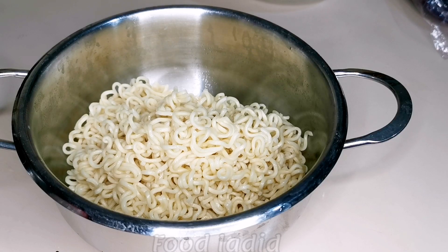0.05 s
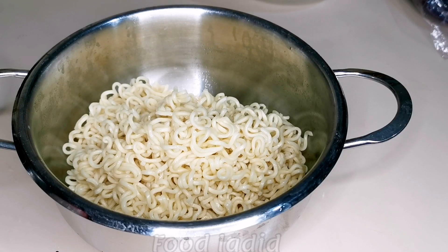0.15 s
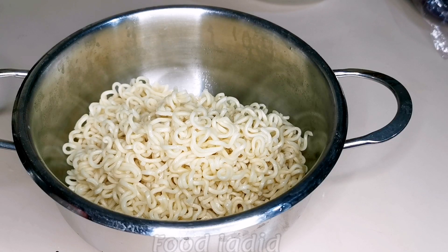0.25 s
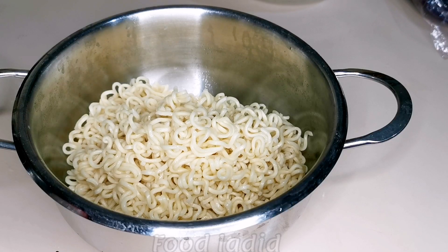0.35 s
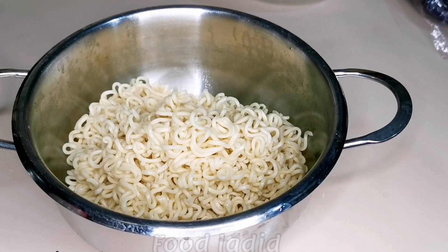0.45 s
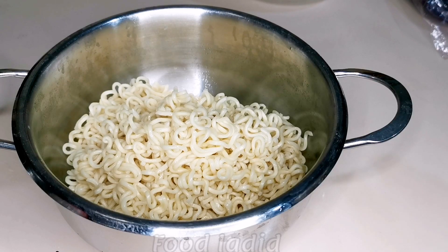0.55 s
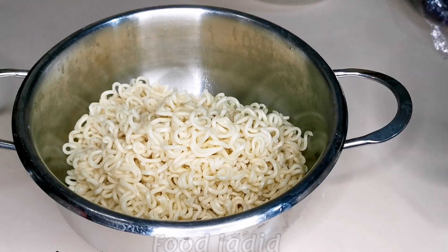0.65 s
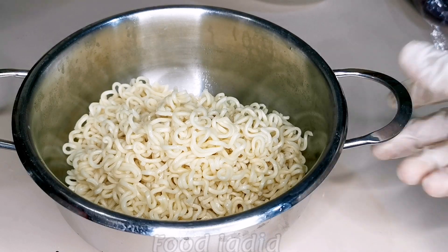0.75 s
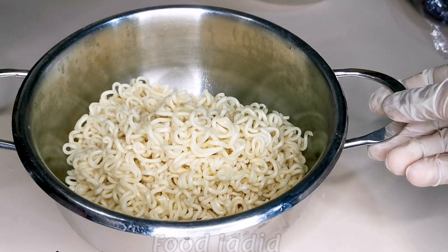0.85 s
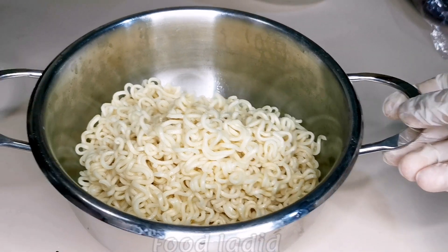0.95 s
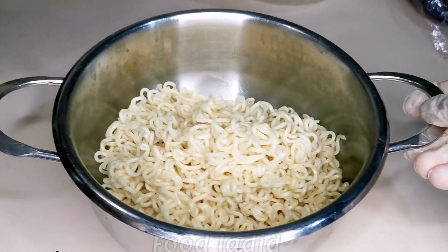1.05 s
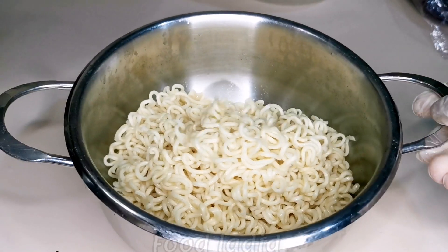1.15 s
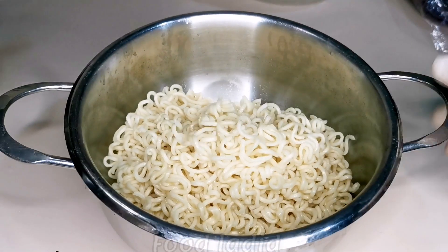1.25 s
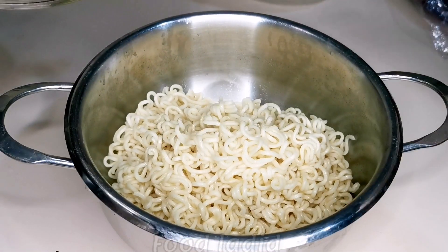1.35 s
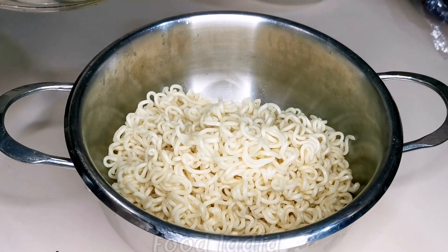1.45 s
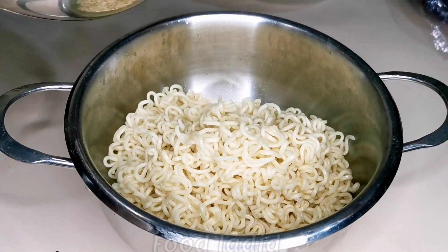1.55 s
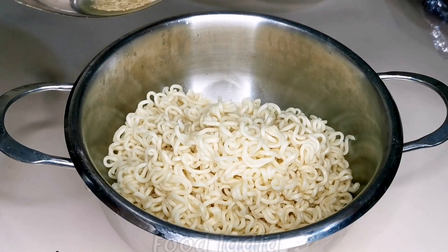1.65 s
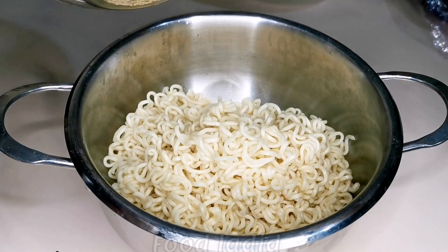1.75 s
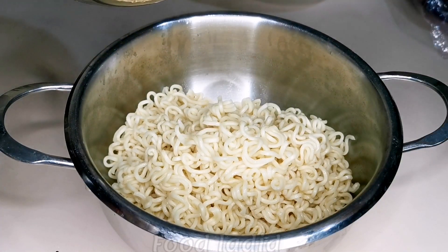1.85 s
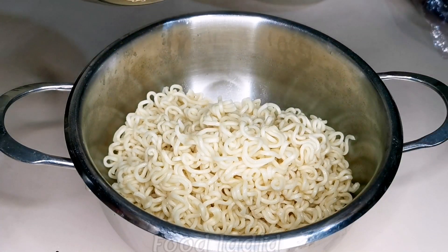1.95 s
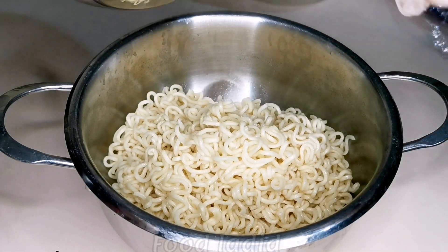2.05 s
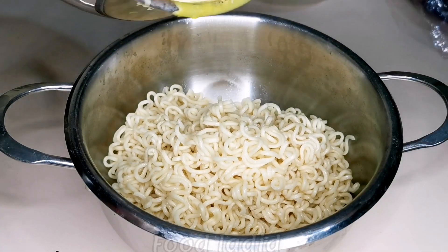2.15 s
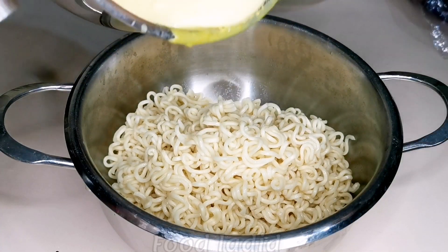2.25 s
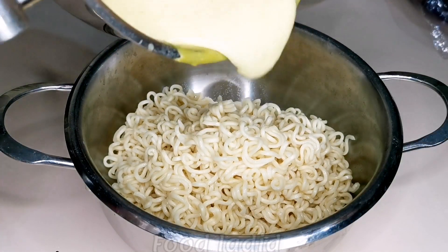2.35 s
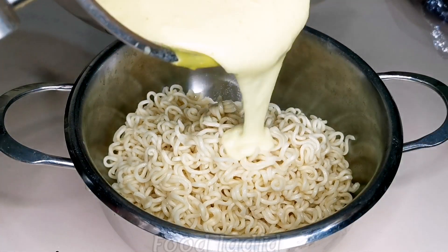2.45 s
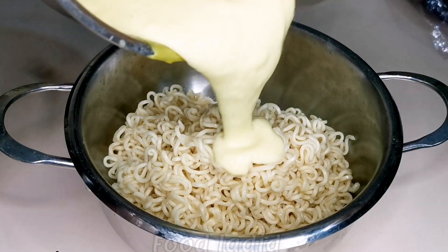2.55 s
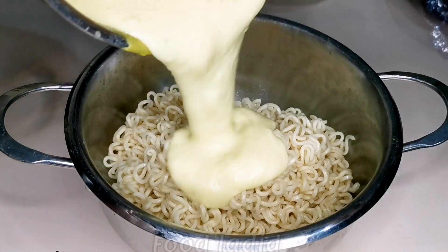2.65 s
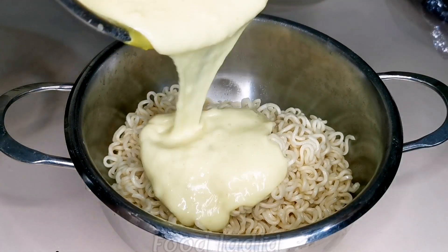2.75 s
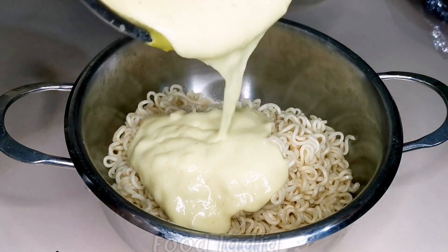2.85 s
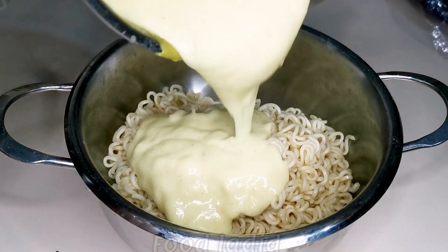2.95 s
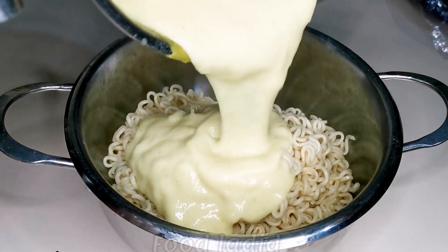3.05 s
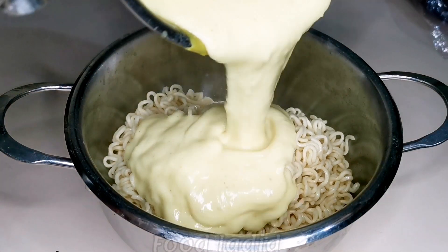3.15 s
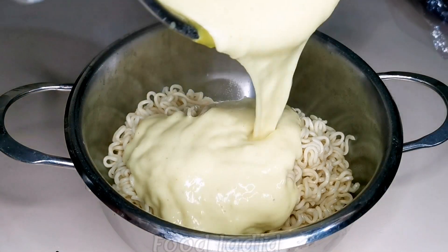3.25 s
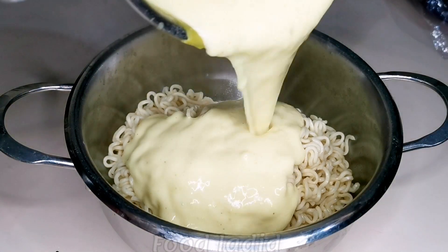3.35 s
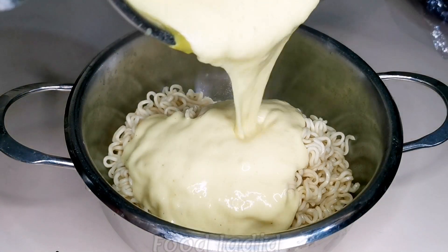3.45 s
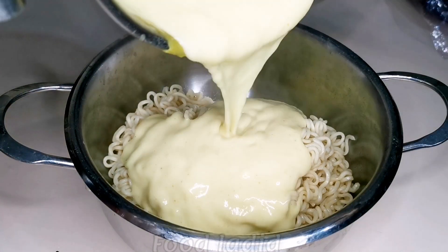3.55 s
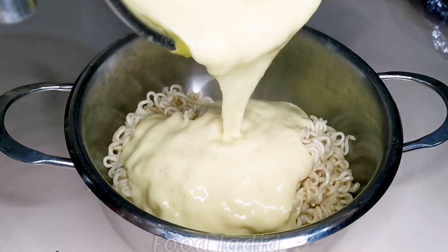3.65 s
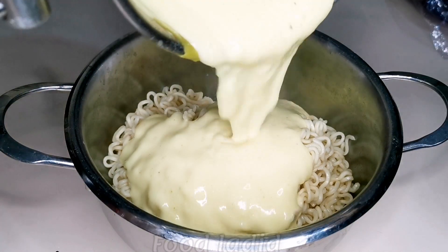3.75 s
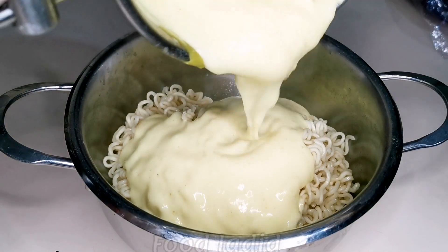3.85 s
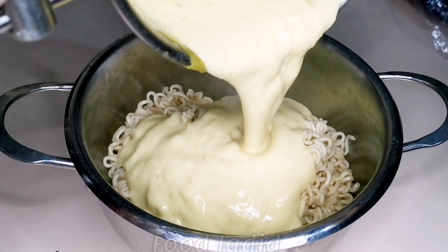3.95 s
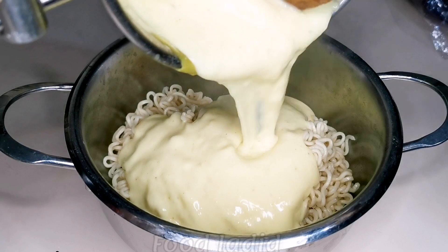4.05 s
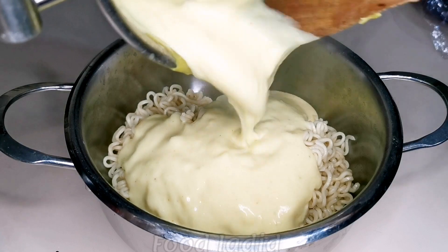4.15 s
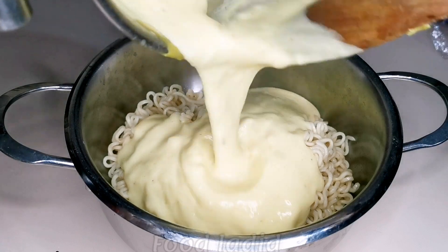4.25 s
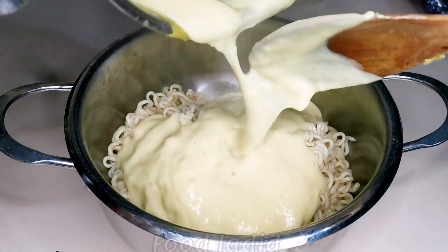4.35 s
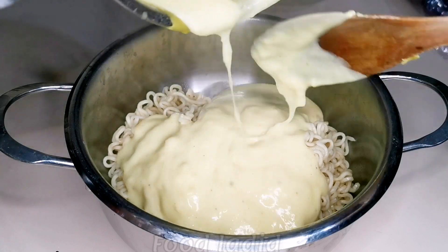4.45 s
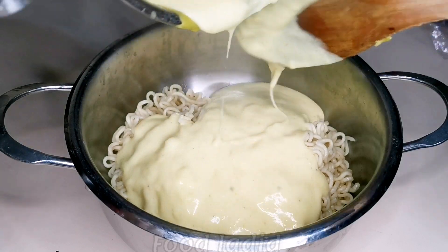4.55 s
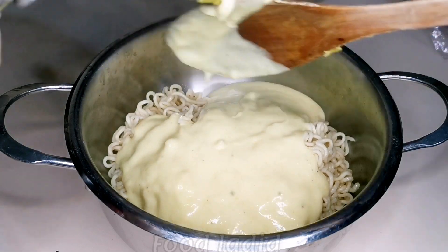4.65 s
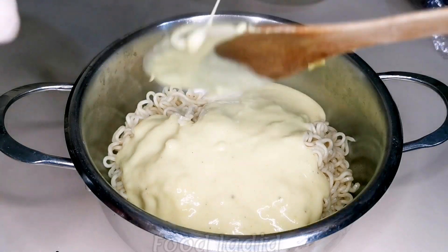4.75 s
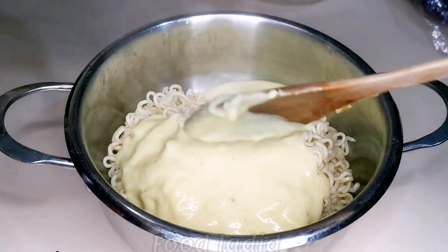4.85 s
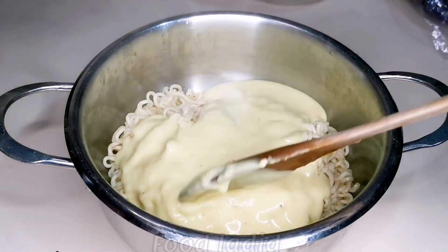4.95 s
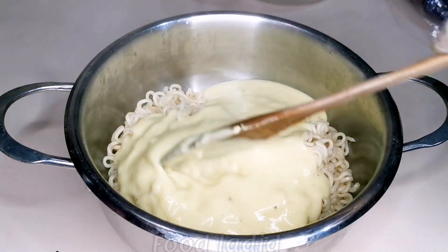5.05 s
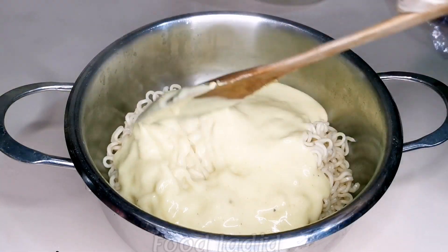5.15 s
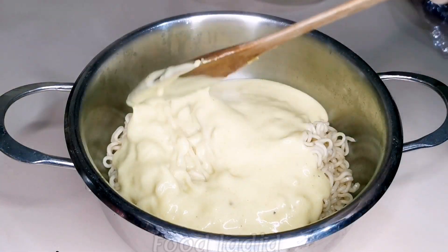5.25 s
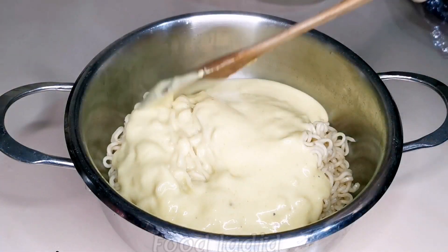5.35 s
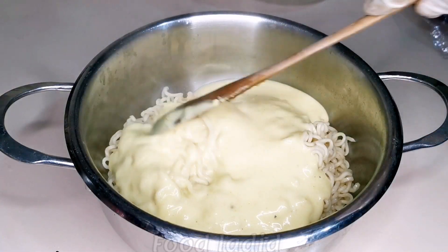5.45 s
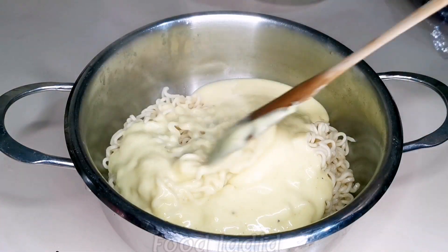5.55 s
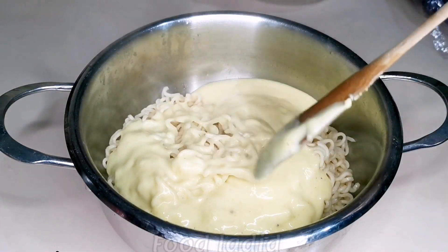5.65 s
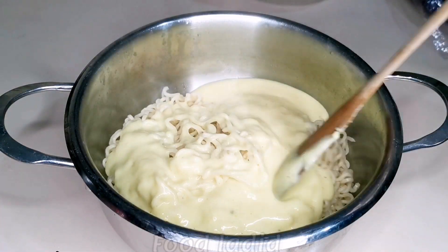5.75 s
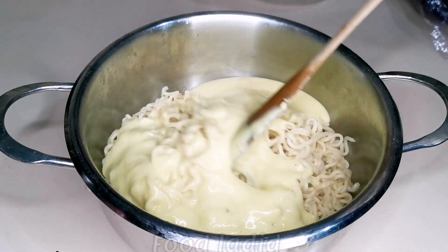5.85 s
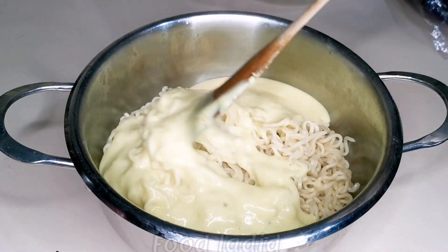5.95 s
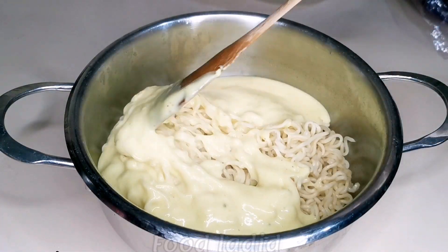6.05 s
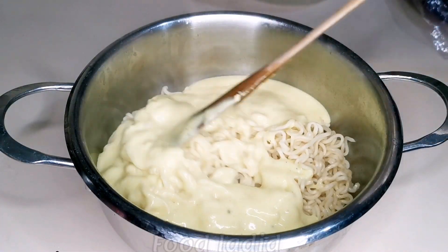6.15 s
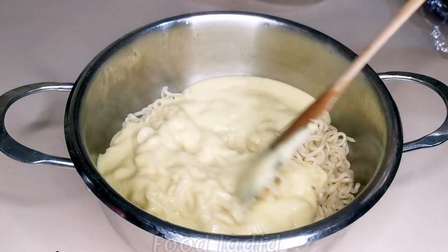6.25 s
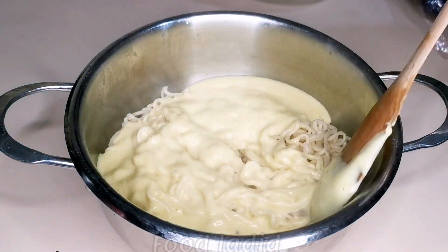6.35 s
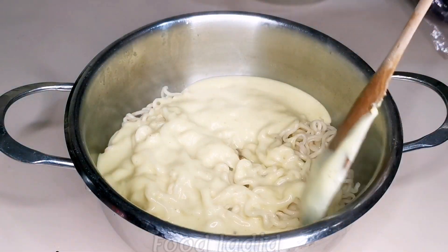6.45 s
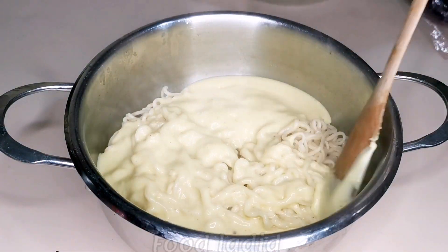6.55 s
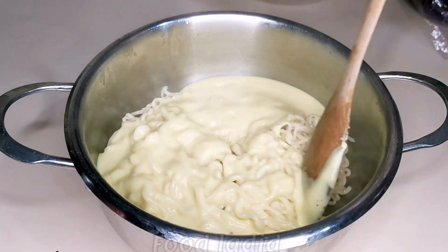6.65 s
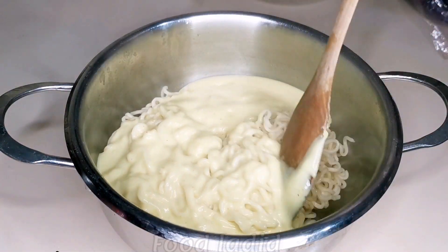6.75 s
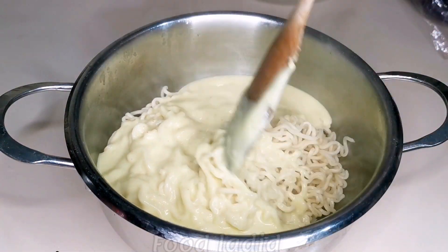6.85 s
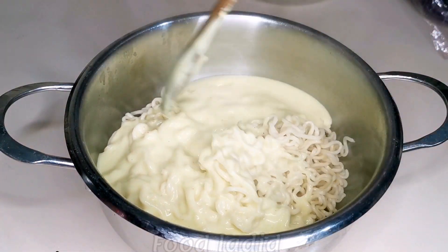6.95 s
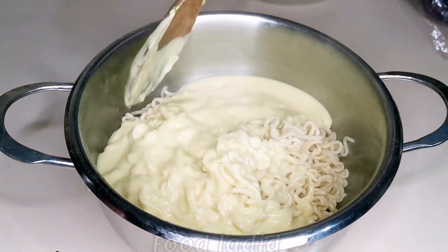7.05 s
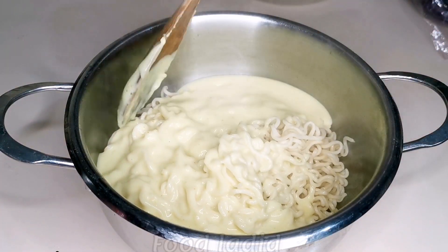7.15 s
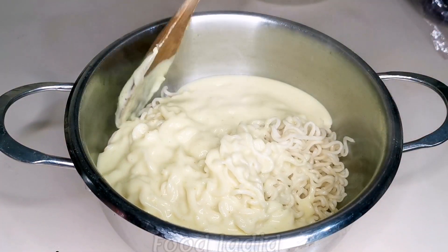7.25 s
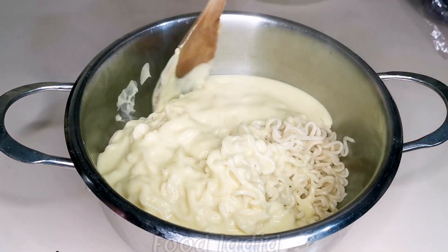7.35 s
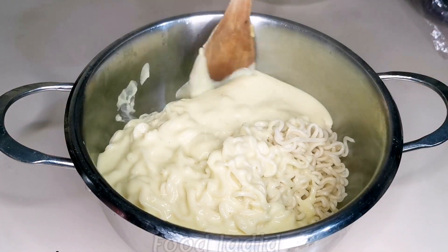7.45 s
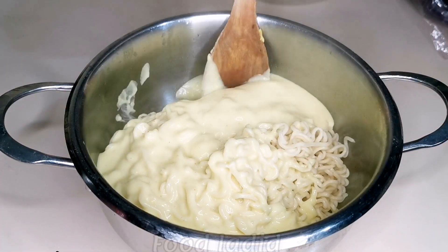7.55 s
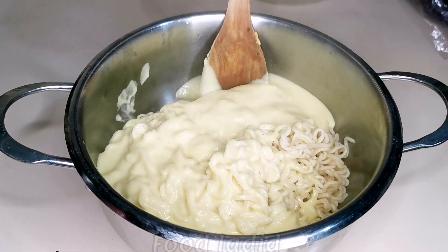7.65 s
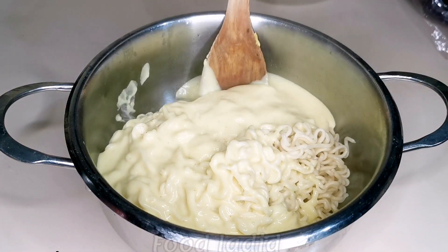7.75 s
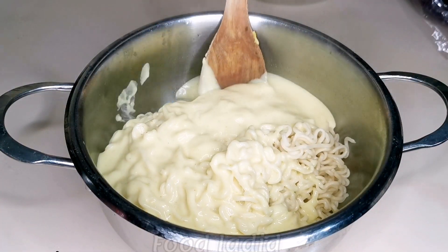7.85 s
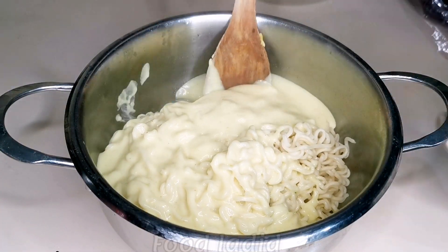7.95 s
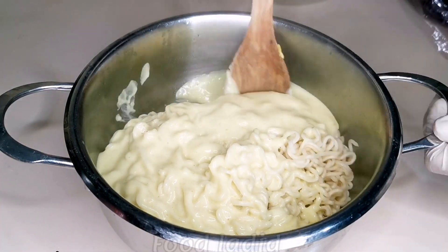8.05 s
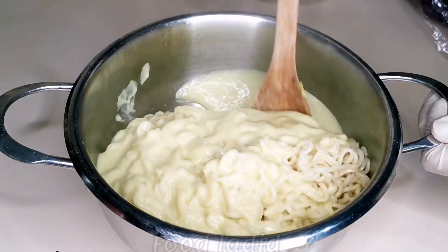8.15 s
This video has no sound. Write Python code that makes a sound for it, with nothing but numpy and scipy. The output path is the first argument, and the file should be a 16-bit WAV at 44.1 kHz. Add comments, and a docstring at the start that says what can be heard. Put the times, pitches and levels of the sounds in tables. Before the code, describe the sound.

Close stereo pickup in a small echoing kitchen, over soft room air and appliance hum. First a small steel clink and a short, groaning pot slide, then glove rubs and tiny sticky clicks. Thick sauce pours almost silently, with a woody knock on the pan. Soft, even stirring follows, interrupted by a dull metal touch and a hard saucepan landing that rings, bounces, stutters and thumps the counter.

```python
"""Kitchen air and a wavering appliance hum run throughout. A steel dish clinks first, then a pot of noodles
slides over the counter, with rumble, rustles and small steel clinks. A wooden spoon knocks a saucepan as its
thick sauce is poured in, then stirs with soft wet rustles and clicks. The emptied pan brushes the stove top,
is put down hard, skids and settles. Blows ring decaying tones, rubbing is shaped noise, and the room echoes."""
import sys
import numpy as np
from scipy import signal
from scipy.fft import rfft, irfft
from scipy.io import wavfile
from scipy.ndimage import uniform_filter1d, map_coordinates

SR = 44100
rng = np.random.default_rng(int(sys.argv[2]) if len(sys.argv) > 2 else 0)


def store_wav(level_fs):
    """Save 16-bit WAV to argv[1]."""
    pcm = np.round(np.clip(np.atleast_2d(level_fs), -1, 1) * 32767)
    wavfile.write(sys.argv[1], SR, pcm.T.astype(np.int16))


N = 361619
TIME = np.arange(N) / SR
RING = TIME[:SR]  # one second, the longest that a single blow lasts

# Tones of the saucepan when free: (pitch [Hz], level [dB], time to fall 60 dB [s])
PAN_MODES = [(345, -7, .28), (378, -2, .2), (400, -1, .17), (417, -5, .4), (524, -6, .27), (540, -9, .25),
             (560, -10, .3), (588, -6, .45), (640, -6, .2), (673, -7, .27), (692, -7, .22), (738, -6, .52),
             (765, -2, .14), (800, -6, .3), (872, -10, .36), (962, -12, .45), (1068, -13, .42),
             (1127, -13, .2), (1170, -11, .17), (1299, -9, .35), (1345, -12, .25), (1475, -15, .37),
             (1658, -19, .33), (1868, -17, .17), (1998, -17, .4), (2046, -21, .3), (2196, -18, .33),
             (2290, -16, .27), (2589, -18, .27), (3031, -26, .3), (3700, -20, .15), (3900, -18, .15),
             (4250, -18, .22)]
# Spectrum of the pan's short rattle: (frequency [Hz], level [dB])
PAN_RATTLE_TONE = [(100, -6.5), (300, -16), (420, -2.5), (560, -4), (750, -1.5), (950, -7), (1200, -5),
                   (1600, -11.5), (2300, -14), (3100, -22.5), (4100, -19.5), (6500, -21.5), (10000, -18.5),
                   (15000, -15)]
STIR_START_S, STROKE_S, STROKE_COUNT = 5.07, 0.49, 4  # the spoon goes round at an even pace


def amp(db):
    """Turn decibels into a gain."""
    return 10 ** (np.asarray(db) / 20)


def unit(x):
    """Scale to an average (rms) strength of 1."""
    return x / np.sqrt(np.mean(x ** 2))


def along(points, hz):
    """Read (Hz, value) points on a log-frequency axis."""
    f, value = np.transpose(points)
    return np.interp(np.log(hz + 1e-3), np.log(f), value)


def freqs(x):
    """List the frequencies in the spectrum of x."""
    return np.fft.rfftfreq(x.shape[-1], 1 / SR)


def colour(x, points):
    """Filter by a (Hz, dB) spectrum."""
    return irfft(rfft(x) * amp(along(points, freqs(x))), x.shape[-1])


def even(x, size):
    """Spread the energy of a noise burst evenly over the spectrum, so that it favours no note."""
    spectrum = rfft(x)
    power = uniform_filter1d(np.mean(abs(spectrum) ** 2, axis=0), size=size)
    return irfft(spectrum / np.sqrt(power), x.shape[-1])


def noise(size, apart_hz=600):
    """Make noise at two microphones: much alike in the bass, unrelated in the treble."""
    mid, side = rng.standard_normal((2, size))
    alike = 0.87 / (1 + (freqs(mid) / apart_hz) ** 6)
    mid = rfft(mid) * np.sqrt(1 + alike)
    side = rfft(side) * np.sqrt(1 - alike)
    return unit(irfft(np.array([mid + side, mid - side]), size))


def hiss(size, hz, low_db=9, high_db=5):
    """Make a broad noise hump round hz, falling by so many dB an octave to either side."""
    x = noise(size)
    octaves = np.log2((freqs(x) + 1) / hz)
    below = low_db * np.minimum(octaves + 1, 0)  # the fall starts an octave below hz
    above = -high_db * octaves
    hump_db = np.minimum(below, above).clip(None, 0)
    return unit(irfft(rfft(x) * amp(hump_db), size))


def grains(size, rough_db, count=40):
    """Make a gain that jumps from one tiny slip or burst to the next, each lasting count samples."""
    steps = amp(rough_db * rng.standard_normal(size // count + 1))
    return unit(np.repeat(steps, count)[:size])


def walk(count):
    """Drift by chance between count points spread over the scene."""
    return np.interp(TIME, np.linspace(0, TIME[-1], count), rng.standard_normal(count))


def wander(x, share):
    """Let the pitch of a sound drift up and down by chance."""
    drift = walk(count=200)
    speed = 1 + share * (drift - uniform_filter1d(drift, size=SR // 4))
    place = np.cumsum(speed)
    return np.array([map_coordinates(ch, [place], mode="mirror") for ch in x])


def fade(t, t60):
    """Decay exponentially, by 60 dB in t60 seconds."""
    return np.exp(-np.log(1000) * t / max(t60, 1e-3))


def swell(t, length, peak_share, power):
    """A hand movement speeds up to a peak and slows to rest; its sound grows as a power of the speed."""
    return np.interp(t / length, [0, peak_share, 1], [0, 1, 0]) ** power


def add(out, s, x):
    """Mix x into out from time s."""
    i = int(s * SR)
    out[:, i:i + x.shape[-1]] += x[..., :max(N - i, 0)]


def ring(modes, hold=1, lag_s=0.00023, split=0.0133, twin_db=-9):
    """Ring decaying modes in close beating pairs; each reaches the two microphones with its own lag."""
    out = 0
    for hz, db, t60 in modes:
        t = RING + np.array([[1], [-1]]) * rng.uniform(-0.82, 1) * lag_s
        twin_hz = hz * (1 + split * rng.uniform(-2.15, 1.94))
        # the twin fades in over one cycle
        twin = amp(twin_db) * np.cos(2 * np.pi * twin_hz * t) * np.minimum(RING * hz, 1)
        pair = np.sin(2 * np.pi * hz * t) + twin
        out = out + rng.choice([-1, 1]) * amp(db) * fade(RING, t60 * hold) * pair
    return out


def resonate(x, hz, width):
    """Pass x through one damped resonance, at rms 1."""
    return unit(signal.lfilter(*signal.iirpeak(hz, hz / width, fs=SR), x))


def soften(x, hz):
    """A softer contact pushes for longer and leaves out the treble above hz."""
    return signal.sosfilt(signal.butter(2, hz, fs=SR, output="sos"), x)


def radiate(x, hz):
    """A small body radiates little below hz."""
    return signal.sosfilt(signal.butter(2, hz, "high", fs=SR, output="sos"), x)


def crack(spectrum, t60):
    """Noise stands for the crowd of heavily damped modes at the start of a blow."""
    shape = fade(RING, t60)
    burst = even(noise(SR) * shape, size=160)
    burst = colour(burst, spectrum) * (RING < 2 * t60)
    return unit(burst) * np.sqrt(np.mean(shape ** 2))


def knocks(table, modes, spectrum, crack_db, crack_t60):
    """Each blow on an object rings its modes, if any, and adds a short crack."""
    out = np.zeros((2, N))
    for s, db, contact_hz in table:
        blow = ring(modes) + amp(crack_db) * crack(spectrum, crack_t60)
        add(out, s, amp(db) * soften(blow, contact_hz))
    return out


def rustles(table, tone, jerk_db):
    """Fine grainy rubbing swells and dies away in small jerks; thin films give no bass."""
    out = np.zeros((2, N))
    for s, length, db, hz in table:
        rub = colour(hiss(SR, hz, low_db=4.5, high_db=6.5), tone) * grains(SR, rough_db=2.0)
        jerks = uniform_filter1d(grains(SR, jerk_db, count=500), size=200)
        add(out, s, amp(db) * swell(RING, length, peak_share=0.19, power=0.79) * jerks * rub)
    return signal.sosfilt(signal.butter(3, 1500, "high", fs=SR, output="sos"), out)


def background(waver_db=2, drift_rad=0.52, ambient_db=-57.5):
    """Shaped noise is the steady kitchen air; sine tones of wavering level and phase are an appliance."""
    # Lines of the hum before they waver: (pitch [Hz], level [dB])
    hum_lines = [(48.4, -66), (96.9, -76.5), (220.7, -72), (382.2, -70.5), (764.4, -81), (936.7, -79)]
    # Spectrum of the kitchen air: (frequency [Hz], level [dB])
    air_tone = [(15, -6.5), (25, -20), (53, -1.5), (74, -14), (185, -2), (217, -2), (354, -7.5), (384, -3),
                (416, -12.5), (911, -16), (1440, -24.5), (1700, -22.5), (3250, -30), (11000, -30),
                (16000, -36)]
    hum = 0
    for hz, db in hum_lines:
        level = np.sqrt(2) * amp(db + waver_db * walk(count=50))
        hum = hum + level * np.sin(2 * np.pi * hz * TIME + drift_rad * walk(count=50))
    return hum + amp(ambient_db) * unit(colour(noise(N), air_tone))


def kitchen(x, first_s=0.0053, build_s=0.014):
    """Reflections off hard walls build up quickly into a diffuse tail that dies at its own rate by pitch."""
    # How long the room rings: (frequency [Hz], time to fall 60 dB [s])
    room_t60 = [(120, 0.51), (400, 0.54), (1000, 0.5), (3000, 0.66), (12000, 0.62)]
    source, tail = rfft(noise(SR)), 0
    centres = np.geomspace(100, 12800, 8)  # Hz, an octave apart
    for hz, share in zip(centres, np.eye(len(centres))):
        band = irfft(source * along(np.c_[centres, share], freqs(RING)), SR)
        tail = tail + band * fade(RING, along(room_t60, hz))
    build = np.sqrt(np.clip((RING - first_s) / build_s, 0, 1))
    tail = even(tail * build, size=16) * build
    echo = (unit(tail) / np.sqrt(SR))[:, :2 * SR // 3]
    return signal.fftconvolve(x, echo, axes=1)[:, :N]


def rumble():
    """Things moved about nearby give a dull rumble that rises quickly and ebbs."""
    # Movements: (time [s], length [s], peak level [dB])
    moves = [(-0.15, 0.61, -56.5), (1.29, 1.15, -55.5), (7.9, 0.76, -55.5)]
    # Spectrum of the rumble: (frequency [Hz], level [dB])
    dull_tone = [(80, -19), (170, -4), (290, -2), (420, -14.5), (800, -19), (1500, -34.5)]
    effort = 0
    for s, length, db in moves:
        effort = effort + amp(db) * swell(TIME - s, length, peak_share=0.14, power=0.46)
    return unit(colour(noise(N), dull_tone)) * effort


def steel_dish():
    """A steel dish clinks: its modes ring after a short crack."""
    # Blows: (time [s], level [dB], contact cut-off [Hz])
    blows = [(0.1948, -39.5, 7000)]
    # Tones of the dish: (pitch [Hz], level [dB], time to fall 60 dB [s])
    dish_modes = [(328, -4, .22), (528, -9, .1), (790, -5, .13), (875, -3, .16), (913, -4, .16),
                  (1094, 0, .09), (1130, 3, .14), (1160, -1, .07), (1222, -3, .14), (1470, -7, .12),
                  (1800, -11, .1), (2060, -12, .15), (2099, -12, .15), (2293, -11, .17), (2907, -18, .12),
                  (4015, -17, .26), (4310, -12, .25), (4597, -14, .17), (4700, -10, .18), (4765, -14, .2),
                  (4840, -14, .18)]
    # Spectrum of the crack: (frequency [Hz], level [dB])
    crack_tone = [(200, -10), (700, -3.5), (1100, 2.5), (1700, -9), (2400, -5.5), (3300, -23), (4600, -14),
                  (7000, -25), (15000, -26)]
    return knocks(blows, dish_modes, crack_tone, crack_db=3.5, crack_t60=0.07)


def utensils():
    """Thin steel pieces ping briefly, each at its own pitch."""
    # Light clinks: (time [s], level [dB], pitch [Hz], ring time [s])
    clink_list = [(1.322, -59, 1900, .2), (1.322, -63, 4500, .2), (4.683, -62, 4260, .08),
                  (4.788, -54, 3980, .06), (7.619, -39, 3950, .03), (7.967, -48, 2690, .04),
                  (7.970, -51, 3120, .06)]
    # Tones of one piece: (multiple of the pitch, level [dB], share of the ring time)
    piece = [(.955, -9, .6), (1, 0, 1), (1.025, -6, .7), (1.23, -12, .55)]
    out = np.zeros((2, N))
    for s, db, hz, t60 in clink_list:
        modes = [(hz * ratio, mode_db, t60 * share) for ratio, mode_db, share in piece]
        add(out, s, amp(db) * ring(modes))
    return out


def steel_grating():
    """Steel grates briefly against spoon or counter: short cracks without ringing tones."""
    # Grates: (time [s], level [dB], contact cut-off [Hz])
    grate_list = [(4.070, -56, 3000), (4.087, -47, 2600), (7.603, -43.5, 5000), (7.614, -43.5, 4970),
                  (7.619, -40, 5900), (7.966, -51.5, 3870)]
    # Spectrum of a grate: (frequency [Hz], level [dB])
    tick_tone = [(500, -8), (1800, -5), (2700, -3.5), (4000, -4), (5500, -10), (10000, -2), (15000, -13.5)]
    return knocks(grate_list, [], tick_tone, crack_db=11.5, crack_t60=0.038)


def handling_snaps():
    """Handling gives sharp dry snaps: very short cracks without ringing tones."""
    # Snaps: (time [s], level [dB], contact cut-off [Hz])
    snap_list = [(1.322, -49, 6000), (1.652, -51, 10000), (2.4525, -48, 10000), (4.904, -43, 9000)]
    # Spectrum of a snap: (frequency [Hz], level [dB])
    snap_tone = [(600, -8), (1500, -16.5), (2300, 2), (3200, -13), (4300, -5), (7000, -18), (15000, -6)]
    return knocks(snap_list, [], snap_tone, crack_db=9.0, crack_t60=0.02)


def glove_rubs():
    """Gloves rub on the cookware, with the hollow ring of the rubbed steel."""
    # Rubs: (time [s], length [s], level [dB], brightness [Hz])
    rub_list = [(0.01, .15, -60.5, 2600), (0.49, 0.16, -54.5, 3400), (1.76, 0.36, -59.5, 4430),
                (1.975, 0.1, -54, 9500), (2.2, 0.16, -55, 6860), (8.13, 0.34, -52.5, 4600)]
    # Spectrum of the rubbed steel: (frequency [Hz], level [dB])
    steel_tone = [(1400, -1), (2000, 0), (2600, 1.5), (3300, -6), (4000, -1), (4900, 0.5), (6000, -1),
                  (10500, 0.5), (15000, -2)]
    return rustles(rub_list, steel_tone, jerk_db=1.0)


def strokes(stroke_db=-64, bright_hz=5300):
    """List evenly repeated spoon strokes through the noodles, as (s, length s, dB, Hz) rows."""
    return [(STIR_START_S + k * STROKE_S, STROKE_S, stroke_db, bright_hz) for k in range(STROKE_COUNT)]


def wet_rustles():
    """Sauce and noodles squelch, and the spoon stirs them with soft wet rustles."""
    # Squelches: (time [s], length [s], level [dB], brightness [Hz])
    squelch_list = [(3.22, 0.17, -60.5, 10500), (4.665, 0.11, -58.5, 4020), (5.55, 0.1, -50.5, 3570),
                    (5.64, 0.17, -50.5, 7250)]
    # Spectrum of the wet rubbing: (frequency [Hz], level [dB])
    wet_tone = [(1500, -6.5), (2300, 1.5), (3500, -1), (5000, -0.5), (7000, -0.5), (11000, 1),
                (15000, -0.5)]
    return rustles(squelch_list + strokes(), wet_tone, jerk_db=2.0)


def smacks(pour_start_s=3.8, per_s=3, middle_db=-58, spread_db=4, bright_hz=11500):
    """List faint chance clicks from the first pour to the last stroke, as (s, dB, Hz) rows."""
    span = STIR_START_S + STROKE_COUNT * STROKE_S - pour_start_s
    chance = rng.random((int(per_s * span), 2))
    return [(pour_start_s + span * when, middle_db + spread_db * (2 * size - 1), bright_hz)
            for when, size in chance]


def sticky_clicks(rise_s=0.0028, click_t60_s=0.022, fizz_db=-21, fizz_t60_s=0.3, off_centre_db=0.5):
    """Wet films of glove, sauce and noodles part in a quick cluster of snaps, then fizz faintly."""
    # Clicks: (time [s], level [dB], brightness [Hz])
    click_list = [(1.3215, -30.5, 12500), (1.409, -40, 14000), (1.857, -44, 11600), (1.889, -42, 12000),
                  (1.899, -46, 12000), (2.451, -43, 11500), (3.257, -42, 13500), (3.286, -47, 13000),
                  (3.482, -46.5, 13000), (4.087, -44, 11500), (4.904, -38, 12000), (5.072, -49.5, 8000),
                  (5.642, -46, 11000), (6.778, -49.5, 10000), (7.619, -37, 11500), (7.712, -36.5, 13500),
                  (7.803, -39, 11500)]
    out, t = np.zeros((2, N)), RING[:SR // 5]
    decay = fade(t, click_t60_s) + amp(fizz_db) * fade(t, fizz_t60_s)
    shape = np.minimum(t / rise_s, 1) * decay
    for s, db, hz in click_list + smacks():
        snaps = hiss(len(t), hz, low_db=11.5, high_db=3.5) * grains(len(t), rough_db=3.0, count=20)
        add(out, s, amp(db) * shape * snaps)
    # the clicks come from a little to the right
    return out * amp(off_centre_db * np.array([[-1], [1]]) / 2)


def wooden_spoon():
    """A wooden spoon knocks the saucepan, with dull little knocks before and after: short modes and a crack."""
    # Knocks: (time [s], level [dB], contact cut-off [Hz])
    blows = [(1.836, -48.5, 900), (4.0945, -33, 5000), (4.646, -41, 626), (4.690, -53, 900),
             (8.171, -49.5, 900)]
    # Tones of the knock: (pitch [Hz], level [dB], time to fall 60 dB [s])
    spoon_modes = [(382, -12, .14), (465, -8, .12), (560, -9, .12), (650, -2, .1), (786, 3, .125),
                   (1462, -7, .08), (2200, -14, .05), (2590, -9, .08), (3020, -13, .05)]
    # Spectrum of the crack: (frequency [Hz], level [dB])
    crack_tone = [(150, -13), (550, 13), (850, -19), (1150, -12), (1500, -4), (2700, -0.5), (3600, -13),
                  (5000, -9.5), (15000, -15)]
    return knocks(blows, spoon_modes, crack_tone, crack_db=-1.0, crack_t60=0.06)


def sliding_pot(broad_db=-1.0, bright_power=0.23, body_power=0.94):
    """Dense slips of the base excite the loaded pot's damped modes, duller when slow; the base also groans."""
    # Pushes that slide the pot: (time [s], length [s], peak level [dB])
    push_list = [(1.002, 0.22, -41), (1.158, .14, -48)]
    # Spectrum of the broad scrape: (frequency [Hz], level [dB])
    scrape_tone = [(200, -15), (550, -0.5), (750, -1.5), (950, -3), (1400, 0), (2100, -7.5), (3200, -11.5),
                   (5000, -15), (9000, -14), (15000, -21)]
    # Resonances of the loaded pot: (pitch [Hz], width [Hz], level [dB])
    pot_modes = [(2100, 86, -14), (2500, 90, -23), (6130, 200, -19.5), (7800, 130, -16), (9000, 350, -16),
                 (10550, 160, -20), (12250, 500, -22)]
    # The counter flexes under a shifting load: (time [s], level [dB])
    bumps = [(1.159, -53), (1.206, -45.5), (7.631, -42)]
    # Tones of such a bump: (pitch [Hz], level [dB], time to fall 60 dB [s])
    bump_modes = [(32, -1, 0.2), (57.4, -2, 0.15), (90, 2, 0.057)]
    groan_hz, groan_width_hz, groan_db = 735, 180, -46
    groan_start_s, groan_length_s = 1.013, 0.29

    slips = noise(N) * grains(N, rough_db=2.0) * grains(N, rough_db=0.9, count=400)
    body = amp(broad_db) * unit(colour(slips, scrape_tone))
    for hz, width, db in pot_modes:
        body = body + amp(db) * resonate(slips, hz, width)
    push = 0
    for s, length, db in push_list:
        push = push + amp(db) * swell(TIME - s, length, peak_share=0.56, power=1.1)
    speed = push / push.max()  # as a share of the fastest
    treble = colour(body, [(3000, -40), (7000, 0)])
    low = body - treble
    out = push.max() * (low * speed ** body_power + treble * speed ** (1 + bright_power))

    groan = resonate(resonate(slips, groan_hz, groan_width_hz), groan_hz, groan_width_hz)
    groan = wander(groan, share=0.025)  # the resonance shifts as the contact changes
    groan_shape = swell(TIME - groan_start_s, groan_length_s, peak_share=0.19, power=0.59)
    out = out + amp(groan_db) * groan * groan_shape
    for s, db in bumps:
        add(out, s, amp(db) * ring(bump_modes))
    return out


def stove_brush():
    """The saucepan brushes the stove top: ringing modes and a crack."""
    # Touches: (time [s], level [dB], contact cut-off [Hz])
    blows = [(6.5700, -39.5, 2200), (6.582, -43, 520)]
    # Tones of the touch: (pitch [Hz], level [dB], time to fall 60 dB [s])
    stove_modes = [(275, -9, .28), (366, -4, .12), (389, 3, .16), (450, -1.5, .26), (518, -4, .24),
                   (590, -4, .1), (670, -5, .12), (780, -3, .08), (870, -5, .22), (930, -7, .1),
                   (1147, -14, .33), (1240, -19, .3), (1545, -2, .045), (1690, -12, .15), (2164, -20, .2),
                   (2280, -21, .22)]
    # Spectrum of the crack: (frequency [Hz], level [dB])
    crack_tone = [(150, -9), (420, 3), (800, 3), (1300, -11), (1600, -10), (2000, -9), (2700, -27),
                  (12000, -32)]
    return knocks(blows, stove_modes, crack_tone, crack_db=4.5, crack_t60=0.065)


def skid(contact_hz=5500, tone_db=-3, start_s=7.572, length_s=0.0525, drag_db=-42.5):
    """The tilted pan stutters on its edge until its base comes down, stirring its rattle and damped modes."""
    slips = noise(SR) * grains(SR, rough_db=1.0, count=150)
    rattle = unit(soften(colour(slips, PAN_RATTLE_TONE), contact_hz))
    tone = unit(signal.fftconvolve(slips, ring(PAN_MODES, hold=0.35), axes=1)[:, :SR])
    drag = swell(RING, length_s, peak_share=0.89, power=0.54)
    out = np.zeros((2, N))
    add(out, start_s, amp(drag_db) * drag * (rattle + amp(tone_db) * tone))
    return out


def saucepan(ring_db=-7.5, rattle_t60=0.065):
    """The pan lands, bounces and rocks to rest; its weight thumps the counter, which then damps it."""
    # Contacts: (time [s], level [dB], contact cut-off [Hz], counter thump [dB], rattle [dB]),
    # the last two relative to the level
    landings = [(7.2758, -17, 3400, -16, 5.5), (7.3030, -31, 2000, -16.5, 7), (7.397, -38, 1300, -20, 5),
                (7.526, -39.5, 900, -18, 3), (7.615, -31.5, 700, -4, 3.5), (7.6190, -25, 890, -5, 4),
                (7.6245, -26.5, 740, -3.5, 6), (7.642, -28.5, 750, -1.5, 6), (7.668, -33.5, 650, -2, 4)]
    # Tones of the counter when free: (pitch [Hz], level [dB], time to fall 60 dB [s])
    counter_modes = [(44, -9, .3), (74, -3, .2), (115, -10, .45), (136, -13, .25), (222, -2, .18),
                     (257, -2, .22), (285, -2, .18), (402, 1, .16)]
    # a contact this hard lets the pan ring freely; flatter, softer ones damp it
    free_contact_hz, damping_power = 3200, 0.7
    settle_s, settle_t60_s = 7.63, 0.38  # once the whole base is down, the counter mutes the metal
    metal, thump = np.zeros((2, 2, N))
    for s, db, contact_hz, thump_db, rattle_db in landings:
        hold = min(contact_hz / free_contact_hz, 1) ** damping_power
        rattle = amp(rattle_db) * crack(PAN_RATTLE_TONE, rattle_t60)
        blow = amp(ring_db) * ring(PAN_MODES, hold) + rattle
        add(metal, s, amp(db) * soften(blow, contact_hz))
        add(thump, s, amp(db + thump_db) * ring(counter_modes, hold))
    metal = metal * fade(np.maximum(TIME - settle_s, 0), settle_t60_s)
    return radiate(metal, hz=219) + radiate(thump, hz=69.0)


def scene():
    """Every source but the background is heard directly and, by its own share, through the room."""
    near = glove_rubs() + wet_rustles() + sliding_pot() + rumble()
    dish = steel_dish()
    clinks = utensils() + steel_grating()
    clicks = handling_snaps() + sticky_clicks()
    spoon = wooden_spoon()
    stove = stove_brush()
    pan = saucepan() + skid()
    sources = [(near, -7.0), (dish, -6.5), (clinks, -4.0), (clicks, -9.0),
               (spoon, -11.0), (stove, -5.5), (pan, -3)]  # (sound, level sent to the room [dB])
    direct = sum(sound for sound, _ in sources)
    room = kitchen(sum(amp(db) * sound for sound, db in sources))
    return direct + room + background()


def record(dry):
    """The microphones have a small treble peak, the right one is a little brighter; the top is cut steeply."""
    # Balance of the two sides: (frequency [Hz], left minus right [dB])
    balance = [(250, 1.7), (700, -4), (4000, -0.5), (12000, -4.5)]
    # Response of both microphones: (frequency [Hz], level [dB])
    response = [(8000, 0.5), (10000, 1), (10900, 2), (12000, 0)]
    top_hz = 15900
    x = np.array([colour(ch, [(hz, side * db / 2) for hz, db in balance]) for ch, side in zip(dry, (1, -1))])
    x = colour(x, response)
    return signal.sosfilt(signal.ellip(10, 0.2, 70, top_hz, fs=SR, output="sos"), x)


dry = scene()
out = record(dry)
store_wav(out)
```